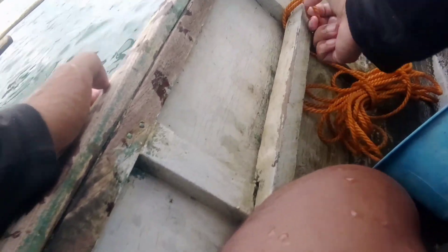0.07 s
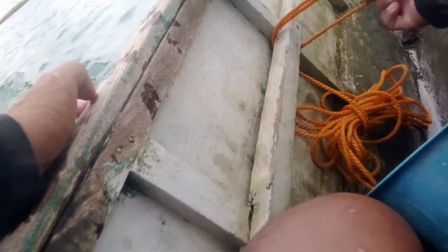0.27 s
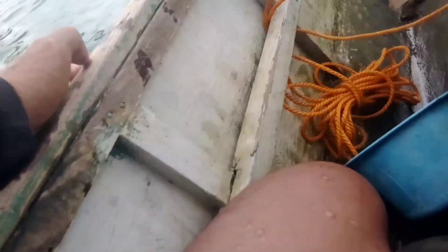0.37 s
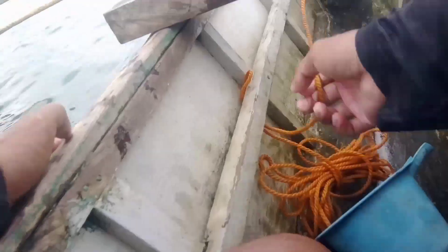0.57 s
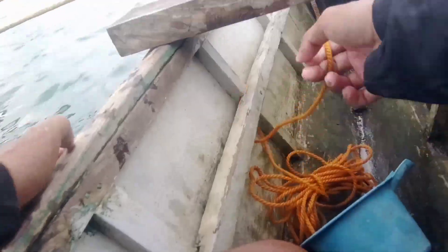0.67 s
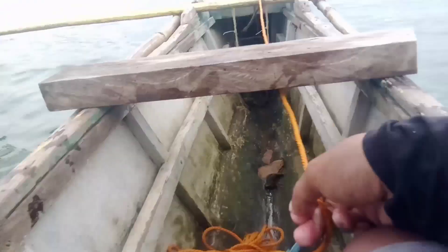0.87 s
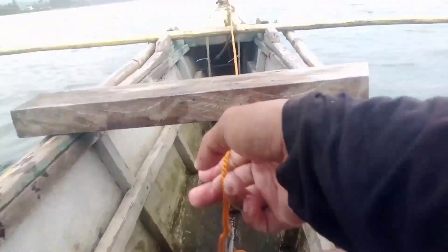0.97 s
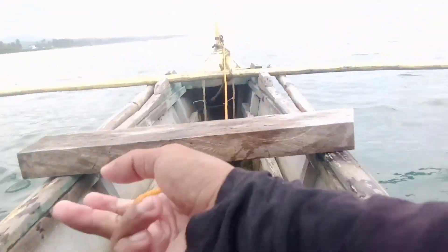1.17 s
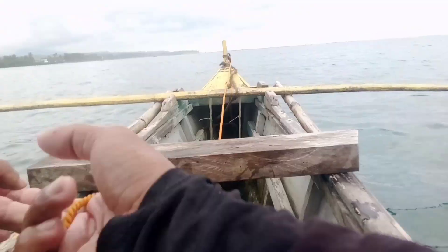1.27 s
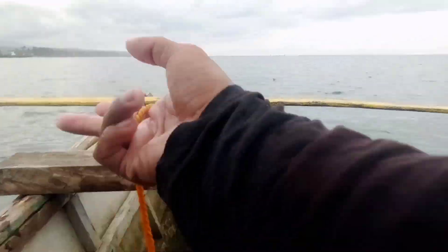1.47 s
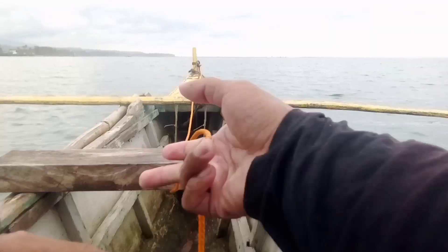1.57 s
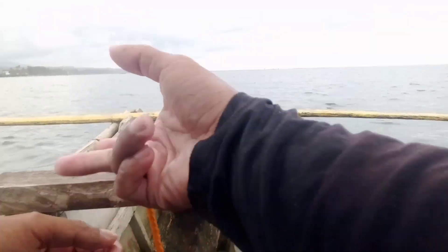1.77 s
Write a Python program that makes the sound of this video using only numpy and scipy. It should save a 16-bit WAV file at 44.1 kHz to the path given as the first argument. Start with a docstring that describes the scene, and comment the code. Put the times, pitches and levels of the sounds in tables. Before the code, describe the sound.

After a near-quiet start, a rope stutters over a wooden edge and knocks the hull, then rasps by hand among cracks, ticks and hollow board ringing; soft wind and sea beneath, close muffled microphone.

```python
"""A wet rope is hauled into a small wooden boat: slips over a rib drum on the hull's resonances.
It then rasps through the hand: hiss made of many tiny fibre catches over a smooth rub.
Loops and gear knock on the planks (fading tones and cracks), among short scuffs, scrapes and ticks of hiss.
Planks ring and a floorboard groans, as resonances, each fed by rubbing noise of its own.
Light wind and water, both shaped noise, lie underneath; the microphone is close and dull."""
import sys
import numpy as np
from scipy import signal
from scipy.fft import rfft, irfft
from scipy.io import wavfile
from scipy.ndimage import uniform_filter1d, map_coordinates

SR = 44100
rng = np.random.default_rng(int(sys.argv[2]) if len(sys.argv) > 2 else 0)


def wav_record(signal):
    """Record a signal, one row per channel, as 16-bit PCM in the file named by sys.argv[1]."""
    frames = np.transpose(np.atleast_2d(signal))
    bounded = np.clip(frames, -1, 1)
    # unit amplitude maps onto the largest positive 16-bit level
    quanta = np.round(bounded * 32767).astype(np.int16)
    wavfile.write(sys.argv[1], SR, quanta)


N = 81585
TIME = np.arange(N) / SR  # seconds

# Tone colour of the cracks and scuffs. Each row: frequency in Hz, level in dB.
CRACK_COLOUR = [(300, -21), (900, -3), (1500, 1), (3500, -3.5), (4100, -9), (5000, -27.5), (6500, -42)]


def amp(db):
    """Turns decibels into a gain."""
    return 10 ** (np.asarray(db) / 20)


def unit(x):
    """Scales a signal to an average (rms) size of 1."""
    return x / np.sqrt(np.mean(x ** 2) + 1e-20)


def level(points):
    """Draws a gain over time through (seconds, dB) points."""
    return amp(np.interp(TIME, *np.transpose(points)))


def fade(t, t60):
    """Dies away by 60 dB in t60 seconds, as a struck thing loses its energy."""
    return np.exp(-np.log(1000) * t / t60)


def strike(t, rise_s):
    """Rises smoothly from silence, as a blow takes a moment to press in."""
    return 1 - np.exp(-(t / rise_s) ** 2)


def colour(x, points, focus_hz=1000, focus_db=0):
    """Filters by (Hz, dB) points, with an optional broad boost around focus_hz; rms 1."""
    focus_octaves = 0.91  # spread of the boost to either side
    octave = np.log2(np.fft.rfftfreq(len(x), 1 / SR) + 1)
    hz, db = np.transpose(points)
    bump_db = focus_db * np.exp(-.5 * ((octave - np.log2(focus_hz)) / focus_octaves) ** 2)
    gain = amp(np.interp(octave, np.log2(hz), db) + bump_db)
    return unit(irfft(rfft(x) * gain, len(x)))


def steady(x, size):
    """Evens out the loudness over size samples, so that a later gain can set it."""
    power = uniform_filter1d(uniform_filter1d(x ** 2, size), size)
    return x / np.sqrt(abs(power) + 1e-20)


def ring(x, modes):
    """Lets x excite (Hz, width in Hz, dB) resonances, and cuts what lies outside their range."""
    out = np.zeros(len(x))
    for hz, width, db in modes:
        out += amp(db) * signal.lfilter(*signal.iirpeak(hz, hz / width, SR), x)
    band = [modes[0][0] * 0.76, modes[-1][0] * 1.128]
    return signal.sosfilt(signal.butter(4, band, "band", fs=SR, output="sos"), out)


def add(mix, s, sound):
    """Mixes a sound in at s seconds, cut off where the mix ends."""
    part = mix[round(s * SR):][:len(sound)]
    part += sound[:len(part)]


def fibres():
    """Rubbing rope: tiny random catches of its fibres over a smooth rub."""
    fibres_per_s, spread_db, smooth_share = 1800, 2, 0.59
    catches = (rng.random(N) < fibres_per_s / SR) * rng.choice([-1, 1], N)
    sizes = amp(spread_db * np.minimum(rng.exponential(1, N), 4))
    return unit(catches * sizes) + smooth_share * rng.standard_normal(N)


def flutter(x):
    """The twisted strands pass unevenly: patches of the hiss swell and fade in time and pitch."""
    flutter_db = 2
    z = signal.stft(x, nperseg=512)[2]
    patches = uniform_filter1d(rng.standard_normal(z.shape), size=5, axis=0)
    patches = unit(uniform_filter1d(patches, size=4, axis=1))
    return signal.istft(z * amp(flutter_db * patches), nperseg=512)[1][:N]


def wander(x):
    """The pitch of a ring wavers as the point of contact moves: x is read at a varying speed."""
    speed_share = 0.025  # typical change in reading speed
    drift = uniform_filter1d(rng.standard_normal(N), size=2400)
    drift = unit(uniform_filter1d(drift, size=1200))
    return map_coordinates(x, [np.cumsum(1 + speed_share * drift)], order=1, mode="mirror")


def weather():
    """Lumpy wind on the microphone over an even wash of the sea, both made of coloured noise."""
    # Wind strength. Each row: time in seconds, level in dB.
    wind_strength = [(0, -57.5), (.12, -41.5), (.19, -57), (.36, -31.5), (.58, -39.5), (.76, -40),
                     (.81, -53.5), (.86, -43.5), (.9, -61), (1.02, -47), (1.28, -52), (1.55, -48),
                     (1.81, -50)]
    # Tone colours of wind and water. Each row: frequency in Hz, level in dB.
    wind_colour = [(25, -38.5), (80, 0.5), (135, -3.5), (400, -13.5), (1000, -71.5)]
    water_colour = [(200, 1), (450, 4.5), (1100, -16), (2000, -26), (3800, -25), (5000, -39), (7000, -52)]
    water_db = -55
    wind = steady(colour(rng.standard_normal(N), wind_colour), size=2000) * level(wind_strength)
    water = amp(water_db) * colour(rng.standard_normal(N), water_colour)
    return wind + water


def groan():
    """A floorboard's one low resonance, fed by rubbing noise, glides as the rope shifts on it."""
    # The groan's course. Each row: time in seconds, level in dB, pitch in Hz.
    groan_path = [(.6, -57.5, 334), (.68, -36, 346), (.705, -41.5, 298), (.74, -31.5, 345), (.81, -46, 329),
                  (0.879, -62, 389.4), (0.969, -41.5, 320), (1.031, -55, 340), (1.389, -55, 284.2),
                  (1.438, -31, 315), (1.5, -56, 415.5), (1.75, -49.5, 364), (1.82, -46, 419)]
    width_hz = 66
    s, db, hz = np.transpose(groan_path)
    turn = np.exp(2j * np.pi * np.cumsum(np.interp(TIME, s, hz)) / SR)
    # Shift the pitch down to zero, keep a narrow band there, and shift it back up
    low_pass = signal.butter(2, width_hz / 2, fs=SR, output="sos")
    note = turn * signal.sosfilt(low_pass, fibres() / turn)
    return steady(note.real, size=1000) * amp(np.interp(TIME, s, db))


def boards():
    """The sliding rope keeps the planks' resonances ringing with a hollow sound."""
    # Strength of the ringing. Each row: time in seconds, level in dB.
    ring_strength = [(.8, -57), (1.03, -41.5), (1.19, -45), (1.31, -56.5), (1.35, -33), (1.49, -39.5),
                     (1.525, -34.5), (1.555, -41), (1.578, -33), (1.605, -42.5), (1.65, -40), (1.71, -49),
                     (1.785, -41), (1.82, -49)]
    # Plank resonances before the pitch wavers. Each row: frequency in Hz, width in Hz, level in dB.
    plank_modes = [(470, 32, -21), (632.7, 37, 7), (719, 16, 1), (773.4, 13, -5)]
    return steady(wander(ring(fibres(), plank_modes)), size=1000) * level(ring_strength)


def scuffs():
    """Short scuffs, scrapes and ticks: a quick rise and a soft fall of hiss."""
    # The scuffs. Each row: start in seconds, length in seconds, level in dB, centre of boost in Hz.
    scuff_rows = [(.004, 0.06, -51, 3700), (0.211, 0.013, -52.5, 3740), (0.337, 0.011, -33.5, 2900),
                  (0.37, 0.023, -25.5, 3200), (0.73, 0.021, -29, 2700), (0.965, 0.004, -26, 2300),
                  (1.101, .045, -41.5, 3700), (1.19, 0.021, -36, 2400), (1.297, 0.0087, -42.5, 3300),
                  (1.375, 0.009, -27.5, 1700), (1.517, 0.039, -49.5, 3800), (1.593, 0.004, -54, 4400),
                  (1.699, .005, -36.5, 1430), (1.714, 0.018, -49.5, 2900), (1.739, 0.017, -43, 2100)]
    focus_db = 13
    out = np.zeros(N)
    for s, length, db, hz in scuff_rows:
        arch = np.sin(np.pi * np.sqrt(np.minimum(TIME / length, 1)))
        hiss = colour(rng.standard_normal(N), CRACK_COLOUR, hz, focus_db)
        add(out, s, amp(db) * arch * hiss)
    return out


def knocks():
    """Each blow gives a fading, sagging plank note and a crack: a high tone in a rattle."""
    # Blows on the planks. Each row: start in seconds, plank pitch at the start in Hz, plank level
    # in dB, plank fade by 60 dB in seconds, crack level in dB, crack pitch in Hz.
    blows = [ (.243, 479, -14.5, .065, -24, 3770), (.268, 388, -18.5, 0.056, -17.5, 3310),
             (0.2805, 372, -21.5, 0.061, -16, 1805), (.407, 944, -4, 0.013, -20.5, 2270),
             (.416, 837, -12, 0.021, -24.5, 1226), (.6095, 705, -24, 0.027, -33.5, 2180),
             (0.7318, 633, -34, 0.085, -17, 1957), (0.8671, 960, -15.5, 0.025, -12, 2050),
             (.877, 838, -22, 0.055, -49, 2060), (0.9082, 954, -22.5, 0.025, -37, 1800),
             (.930, 828.7, -17, 0.019, -29.5, 1750), (0.9514, 1090, -17.5, 0.021, -16, 1894),
             (.959, 836, -19, 0.036, -27.5, 1940), (1.0225, 736, -31.5, .11, -27, 1950),
             (1.328, 764, -5, 0.029, -12.5, 1713), (1.3385, 716, -3.5, 0.021, -34, 1378),
             (1.361, 698.7, -23, 0.13, -20.5, 1390), (1.386, 490, -21, .12, -19.5, 1536),
             (1.419, 685, -9, 0.021, -20.5, 1600), (1.430, 638, -11, 0.051, -38, 1507), ]
    plank_rise_s, crack_rise_s, crack_t60_s = 0.0013, 0.0013, 0.022
    sag_per_s, rattle_share = 4.4, 0.63
    out, t = np.zeros(N), np.arange(SR // 5) / SR
    for s, hz, plank_db, plank_t60, crack_db, crack_hz in blows:
        turns = hz * np.cumsum(np.exp(-sag_per_s * t)) / SR
        note = np.sin(2 * np.pi * turns) * strike(t, plank_rise_s)
        note *= amp(plank_db) * fade(t, plank_t60)
        rattle = steady(colour(rng.standard_normal(len(t)), CRACK_COLOUR), size=130)
        crack = np.sin(2 * np.pi * crack_hz * t) + rattle_share * rattle
        crack *= strike(t, crack_rise_s) * amp(crack_db) * fade(t, crack_t60_s)
        add(out, s, note + crack)
    return out


def boat(x):
    """Adds short, scattered reflections between the sides of the hull."""
    echo_t60_s, echo_db, taps_per_s = 0.072, -7, 2000
    t = np.arange(SR // 4) / SR
    taps = rng.standard_normal(len(t)) * (rng.random(len(t)) < taps_per_s / SR)
    taps *= (t > .003) * fade(t, echo_t60_s)
    return x + amp(echo_db) * signal.fftconvolve(x, taps / np.linalg.norm(taps))[:N]


def judder():
    """The rope sticks and slips over a rib at a changing rate; each slip thumps the hull."""
    # The rope on the rib. Each row: time in seconds, slips per second before jitter, level in dB.
    slip_path = [(.22, 229, -54.5), (0.254, 247, -28.5), (.32, 202.6, -25), (0.359, 250, -25.5),
                 (.415, 228, -27), (0.456, 150, -32.5), (.485, 123, -25), (0.557, 146, -47.5),
                 (0.617, 162, -34), (0.649, 140, -55.5), (0.949, 214, -55)]
    # Hull resonances. Each row: frequency in Hz, width in Hz, level in dB.
    hull_modes = [(150.5, 10, 10.5), (180, 76, -4), (233, 48, -9), (389.4, 4.7, -6.5), (465.6, 10, -5),
                  (690, 390, -20)]
    rate_jitter, uneven_db = .07, 6  # jitter as a share of the rate
    s, rate, db = np.transpose(slip_path)
    wobble = unit(uniform_filter1d(rng.standard_normal(N), size=200))
    turns = np.cumsum(np.interp(TIME, s, rate) * np.exp(rate_jitter * wobble)) / SR
    # One slip at each whole turn
    slips = np.diff(np.floor(turns), prepend=0) * amp(uneven_db * rng.standard_normal(N))
    return steady(ring(slips, hull_modes), size=1100) * amp(np.interp(TIME, s, db))


def rasp():
    """Fibres scrape on wood, then through the hand; the grip catches and eases many times a second."""
    # Strength of the rub on wood, then in the hand. Each row: time in seconds, level in dB.
    wood_strength = [(0, -52.5), (.18, -62.5), (.238, -59), (.25, -36), (.325, -38.5), (.378, -27),
                     (.395, -36), (.445, -50), (.475, -42.5), (.497, -29), (.535, -45), (.59, -60),
                     (.61, -51), (.725, -45), (.79, -61), (.84, -50), (.88, -66)]
    hand_strength = [(.86, -82), (.89, -39), (.92, -49.5), (.975, -35), (1.01, -45), (1.17, -39.5),
                     (1.205, -43.5), (1.23, -51), (1.315, -61), (1.35, -41.5), (1.39, -38), (1.47, -51.5),
                     (1.527, -51.5), (1.57, -78.5), (1.85, -57)]
    # Tone colour of each rub. Each row: frequency in Hz, level in dB.
    wood_colour = [(300, 0), (700, 5), (1600, -0.5), (2100, 5), (2700, -11), (3700, 1), (4250, -15.5),
                   (4750, -14.5), (6000, -45)]
    hand_colour = [(400, -12), (850, 7.5), (1100, -2), (1300, 5), (1950, 7.5), (2330, -5), (3700, -1.5),
                   (4300, -20.5), (6000, -52.5)]
    grip_db = 1.5
    grip = unit(amp(grip_db * unit(uniform_filter1d(rng.standard_normal(N), size=150))))
    wood = steady(flutter(colour(fibres(), wood_colour)), size=700) * level(wood_strength)
    hand = steady(flutter(colour(fibres(), hand_colour)), size=700) * level(hand_strength)
    return grip * (wood + hand)


def scene():
    """Adds all sources at the microphone; only knocks and scuffs get the hull's reflections."""
    background = weather() + groan() + boards()
    return (background + boat(scuffs() + knocks()) + judder() + rasp())[None]


def record(dry):
    """A dull microphone weakens lows and highs and adds faint hiss; a last filter limits the band."""
    edge_hz = 15500
    cut = signal.sosfilt(signal.butter(2, 44, "high", fs=SR, output="sos"), dry)
    dull = signal.oaconvolve(cut, signal.firwin(numtaps=41, cutoff=5700, fs=SR)[None], "same")
    dull += amp(-33) * cut  # a little of the treble still gets through
    hiss = amp(-89.5) * rng.standard_normal(N)
    band_limit = signal.firwin(511, edge_hz, window=("kaiser", 9), fs=SR)[None]
    return signal.oaconvolve(dull + hiss, band_limit, "same")


dry = scene()
out = record(dry)
wav_record(out)
```